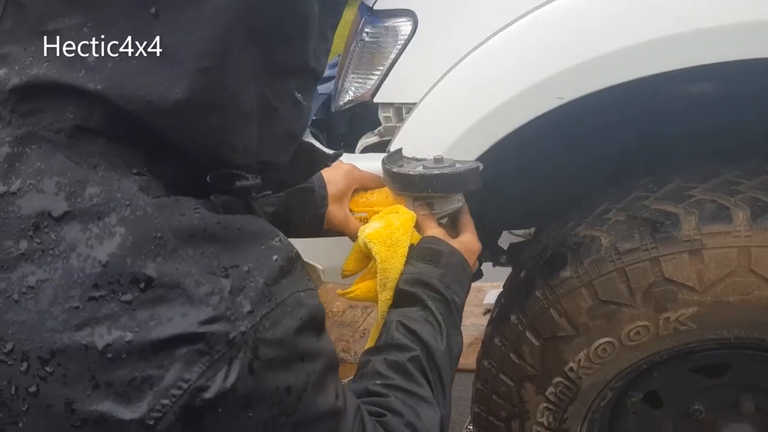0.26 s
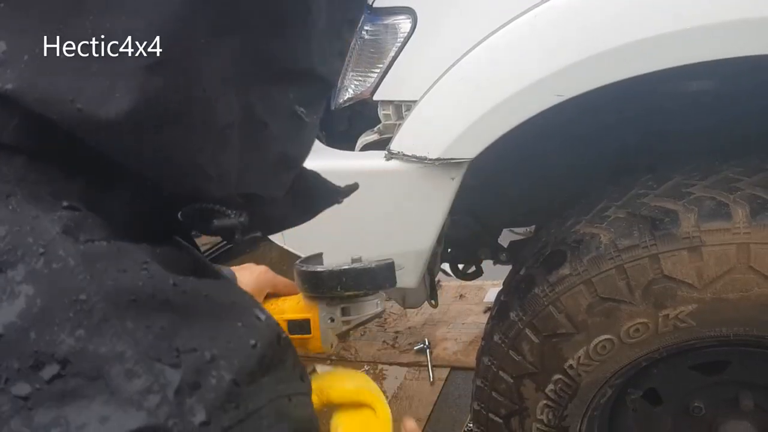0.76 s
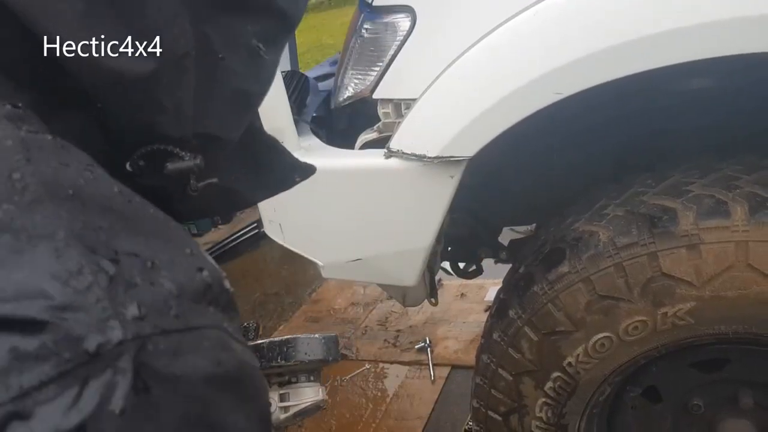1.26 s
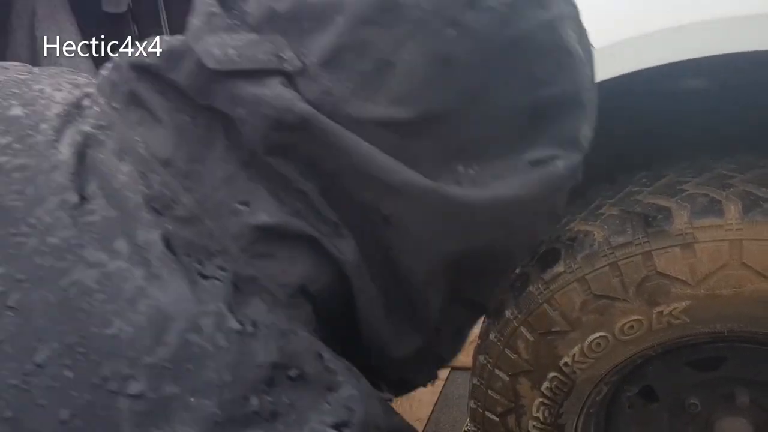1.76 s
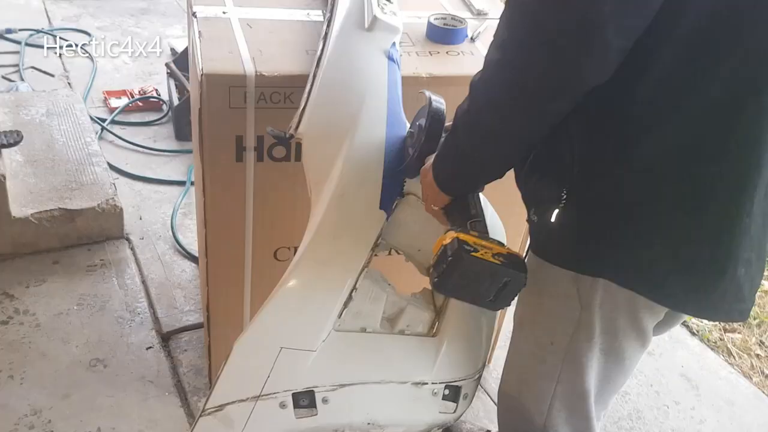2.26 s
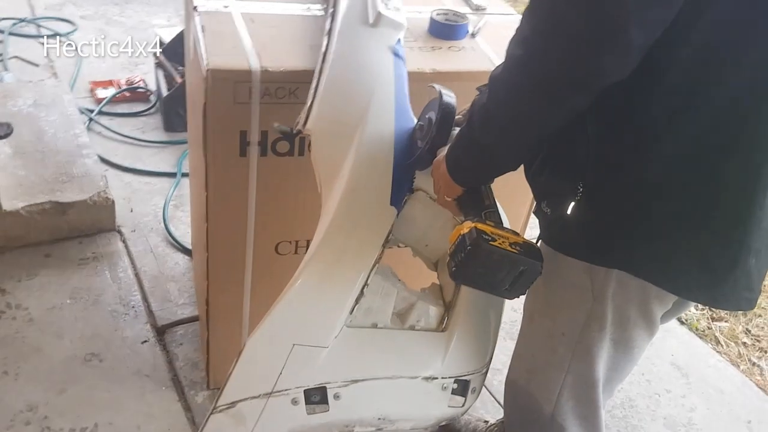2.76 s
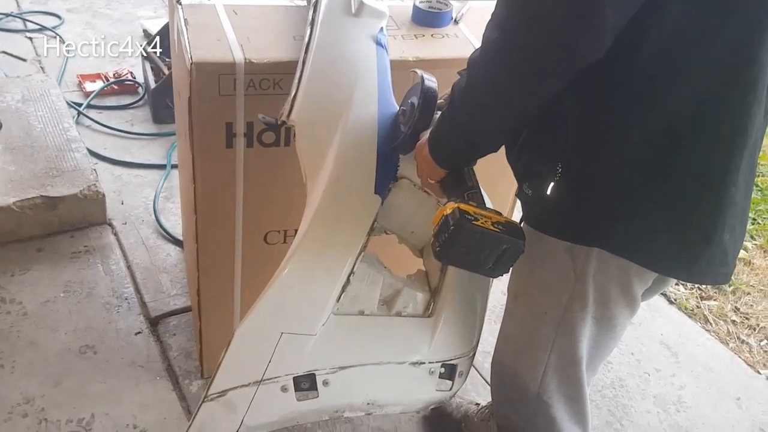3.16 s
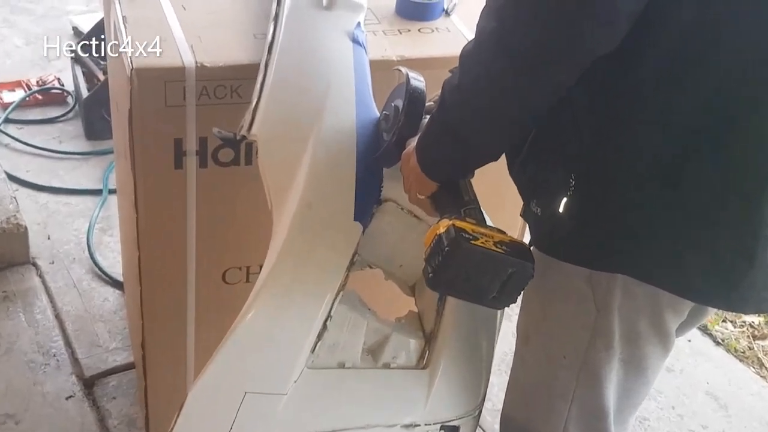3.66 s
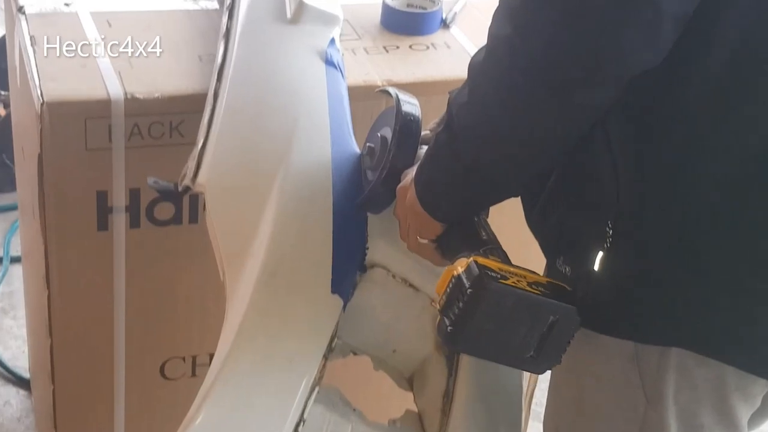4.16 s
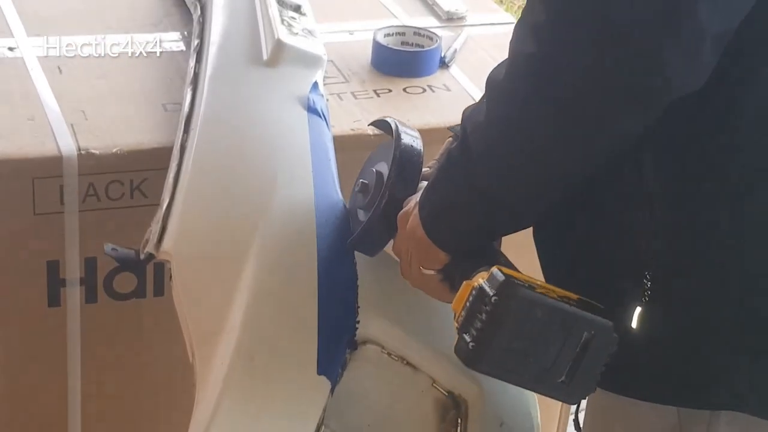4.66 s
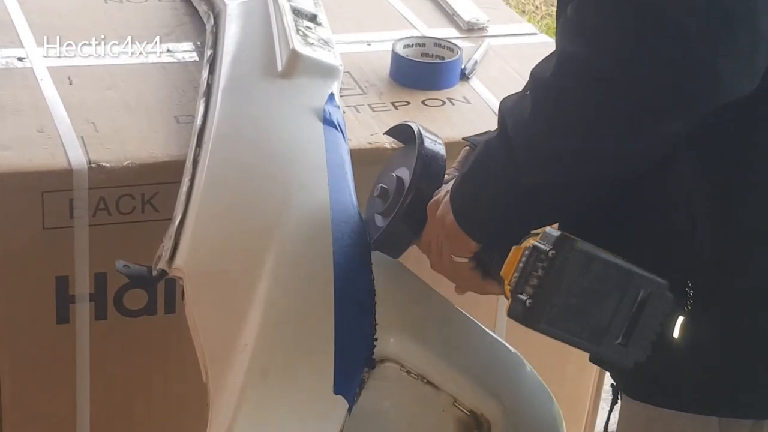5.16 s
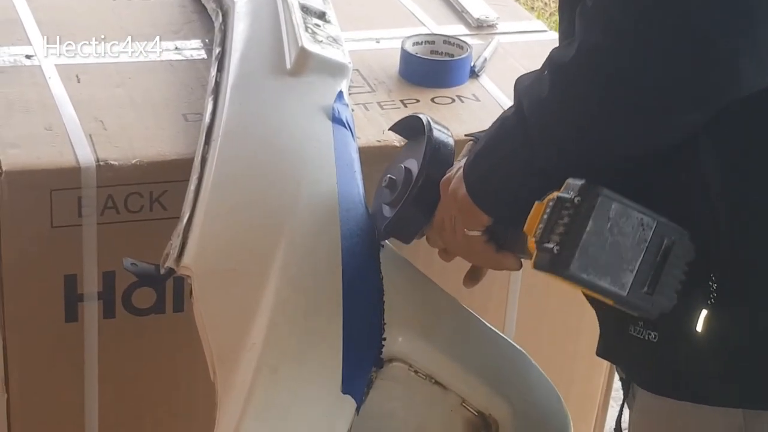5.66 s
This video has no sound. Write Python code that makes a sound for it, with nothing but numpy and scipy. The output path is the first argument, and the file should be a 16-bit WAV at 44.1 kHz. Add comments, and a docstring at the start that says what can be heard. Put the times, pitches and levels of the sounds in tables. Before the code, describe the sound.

A cordless angle grinder cuts plastic with a high whine and hissing rasp, spins free briefly, then cuts again with a sagging pitch.

```python
"""Outdoors, close by, a cordless angle grinder trims plastic car panels.
The disc cuts a wheel arch, lifts off and spins free (fan hiss, motor whine); after a short fade
it works down a loose trim panel. Abrasion gives a broadband rasp. The rim strikes the plastic in
the same pattern on every turn, and this periodic force makes the panel drone on harmonics of a
rotation rate that sags as the disc bites."""
import sys
import numpy as np
from scipy import signal
from scipy.fft import rfft, irfft, next_fast_len
from scipy.io import wavfile
from scipy.ndimage import map_coordinates

SR = 44100
rng = np.random.default_rng(int(sys.argv[2]) if len(sys.argv) > 2 else 0)


def store_wav(level_fs):
    """Save 16-bit WAV to argv[1]."""
    pcm = np.round(np.clip(np.atleast_2d(level_fs), -1, 1) * 32767)
    wavfile.write(sys.argv[1], SR, pcm.T.astype(np.int16))


N = 260322
T = np.arange(N) / SR
FRAME_HZ = 200
FRAMES = np.arange(int(N / SR * FRAME_HZ) + 2) / FRAME_HZ
FREE_TURNS_HZ, GEAR_RATIO = 123.77, 32 / 9
LIFT_S, TRIM_START_S = .49, 2.308   # the disc is clear of the arch; the second cut begins

# Disc speed under load. Each row: time in seconds, turns per second.
ARCH_SPEED = [(0.0, 123.1), (0.09, 123.7), (0.332, 123.5), (0.416, 122.5), (0.45, 123.3)]
TRIM_SPEED = [(2.34, 123.62), (2.55, 121.57), (2.93, 121.41), (3.09, 118.45), (3.4, 120.13), (3.66, 118.49),
              (3.77, 117.38), (3.94, 121.85), (4.06, 121.19), (4.2, 123.99), (4.4, 123.17), (4.5, 118.53),
              (4.61, 112.92), (4.99, 112.83), (5.13, 120.64), (5.29, 123.98), (5.6, 123.58), (5.9, 123.82)]
# Depth of the disc in the trim panel. Each row: time in seconds, depth from 0 to 1.
DEPTH = [(2.4, 0.0), (2.85, 0.11), (3.15, 0.28), (3.8, 0.51), (4.05, 0.62), (4.4, 0.44), (5.12, 0.68),
         (5.24, 0.64)]
# Pinching of the disc by the cut. Each row: time in seconds, binding from 0 to 1.
BINDING = [(4.4, 0), (4.6, 1), (5.0, 1), (5.25, 0)]
# Pressure on the trim panel. Each row: time in seconds, gain in dB.
PRESSURE = [(2.34, 1), (2.46, 0.1), (2.52, -2), (2.62, -0.6), (2.8, 0), (3.2, -0.5), (3.8, -0.5), (4.05, 2),
            (4.2, 1.5), (4.48, 3), (4.65, 1.5), (4.9, 0), (5.05, -0.1), (5.3, 0.1), (5.9, 0.8)]
# The disc snags and the panel flaps. Each row: centre in seconds, half length in seconds, swell in dB.
SNAGS = [(0.351, 0.071, 13), (4.473, 0.037, 1.5), (5.04, 0.04, 4)]
# The drone's response to a snag. Each row: frequency in Hz, share of the swell.
FLAP = [(120, 0.05), (250, 0.75), (500, 0.83), (1300, 0.74), (1550, 0.38), (3000, 0.028)]
# Harmonics of the turning disc; the 32nd is the gear whine. Each row: harmonic number, then relative
# levels in dB on the arch, on the trim's edge, half-way in, deep in and when pinched.
DISC_HARMONICS = [(1, -71, -54, -68, -38, -61), (2, -33, -43, -44, -50, -48), (3, -44, -59, -45, -40, -46),
                  (4, -57, -58, -50, -50, -56), (5, -57, -45, -47, -48, -50), (6, -53, -44, -42, -42, -44),
                  (7, -49, -55, -45, -35.5, -46), (8, -56, -51, -54, -43, -45),
                  (9, -57, -54, -54, -40, -49), (10, -55, -50, -51, -42, -50),
                  (11, -58, -57, -47, -45, -49), (12, -59, -46, -43, -49, -48),
                  (13, -60, -50, -47, -50, -47), (14, -55, -45, -44, -48, -50),
                  (15, -52, -38.5, -52, -52, -48), (16, -52, -48, -51, -52, -51),
                  (17, -60, -40, -45, -49, -44), (18, -52, -48, -52, -45, -47),
                  (19, -53, -38.5, -48, -43, -42), (20, -44, -44, -44, -50, -51),
                  (21, -46, -45, -44, -49, -47), (22, -43, -47, -44, -42, -47),
                  (23, -43, -46, -41, -48, -45), (24, -50, -42, -43, -41, -44),
                  (25, -45, -45, -46, -42, -42), (26, -42, -42, -48, -42, -41),
                  (27, -45, -34, -44, -46, -43), (28, -42, -38, -43, -44, -39),
                  (29, -47, -45, -44, -47, -41), (30, -42, -44, -47, -46, -42),
                  (31, -46, -41, -43, -46, -38), (32, -42, -35.5, -38.5, -37, -36.5),
                  (33, -55, -41, -45, -43, -45), (34, -54, -48, -45, -50, -46),
                  (35, -50, -42, -45, -50, -39), (36, -47, -41, -48, -47, -48)]
# Single harmonics ring out as squeals, hoots or high gear whine.
# Each row: start in seconds, end in seconds, harmonic number, relative level in dB.
SQUEALS = [(0.0, 0.39, 87, -30), (0.24, 0.3, 20, -44), (0.25, 0.295, 42, -32), (2.36, 2.95, 85, -32),
           (2.4, 2.95, 91, -29), (2.45, 2.95, 94, -30), (2.5, 2.95, 90, -33), (2.5, 2.95, 93, -35),
           (2.5, 2.95, 98, -38), (2.36, 3.8, 42, -45), (2.42, 2.5, 29, -35), (2.36, 2.56, 28, -35),
           (3.45, 3.9, 28, -40), (3.95, 4.42, 90, -33), (4.45, 4.54, 4, -35), (4.5, 4.6, 7, -35),
           (4.55, 5.05, 57, -37), (4.6, 5.05, 64, -36), (4.7, 5.0, 96, -33), (5.02, 5.085, 7, -34),
           (5.19, 5.32, 3, -40), (5.2, 5.9, 57, -41), (5.25, 5.9, 85, -39), (5.3, 5.9, 102, -39)]
# Rotor tones. Each row: multiple of the motor speed, relative level in dB.
RATTLE_TONES = [(1, -46), (2, -52.5), (3, -76), (4, -52), (10, -40.5), (11, -40.5), (17, -39), (19, -39.5)]
MOTOR_TONES = [(1, -27), (8, 0), (12, -22), (16, -21), (19, -15)]   # the eight-blade fan gives the strongest
# Fan whine, swelling as the tool is turned about. Each row: time in seconds, level in dB.
FREE_WHINE = [(0.36, -41), (0.42, -34.5), (0.47, -34.5), (0.52, -42), (0.662, -40), (0.698, -37),
              (0.788, -33.5), (0.85, -46), (0.96, -38), (1.072, -32), (1.18, -32.5), (1.245, -43),
              (1.3, -35.5), (1.46, -41), (1.592, -39), (1.604, -32), (1.7, -34), (1.83, -31), (1.91, -40),
              (1.95, -35), (2.036, -45), (2.122, -32), (2.2, -35), (2.27, -38)]   # on the arch and running free
TRIM_WHINE = [(2.34, -38), (2.5, -37), (2.6, -42), (3.3, -43), (4.3, -43), (4.8, -45), (5.2, -42),
              (5.55, -35), (5.9, -39)]
# Low rush of the air. Each row: time in seconds, gain in dB.
LOW_RUSH = [(.5, 4.5), (.8, 1), (1.45, 4), (2.0, 8.5)]
# Soft handling bumps and sharp ticks of flying chips. Each row: start in seconds, peak level in dB.
BUMPS = [(1.185, -38.5), (1.83, -33.5), (2.012, -41)]
CHIPS = [(0.254, -19), (1.516, -25), (2.4, -23), (2.469, -17), (4.477, -6), (4.523, -8)]

# Resonances. Each row: centre in Hz, width in Hz, gain in dB.
PANEL_MODES = [(253.7, 19, 8.5), (482.9, 29, 17), (711, 9, 5.5), (873.3, 26, 12.5), (1526, 71, 5.5),
               (1692, 25, 2.5), (2804, 48, 5.5), (3058, 92, 9.5)]
DISC_GUARD_MODES = [(2530, 630, 4), (10730, 470, 2), (11200, 950, 1.03)]
# Peaks and hollows in the rasp's tone at each stage of the trim cut.
# Each row: centre in Hz, width in Hz, gain in dB.
EDGE_TONE = [(1850, 130, 4), (2450, 400, 1.5), (3400, 330, -0.5), (4800, 200, -3), (5870, 160, -5),
             (8400, 500, -8), (9550, 400, 5), (10300, 160, 6), (11500, 900, -0.5), (12300, 500, -1)]
SUNK_TONE = [(2100, 180, 0), (3820, 200, 3), (4550, 260, -6), (5830, 300, -3), (6520, 200, 0.5),
             (7130, 340, 2.5), (8480, 280, -3), (8840, 200, 4.5), (10650, 210, -0.5)]
PINCHED_TONE = [(3130, 500, -0.5), (3880, 180, 0), (4440, 600, -2.5), (5560, 500, -2.5), (6230, 160, -4),
                (6800, 600, 2), (8000, 460, -3), (10200, 820, -4), (11400, 1200, 4), (13300, 600, -6)]
# Noise spectra. Each row: frequency in Hz, relative spectral density in dB.
ARCH_COLOUR = [(50, -57), (130, -30), (260, -15), (550, -30), (1000, -23), (1600, -28.5), (2600, -17.5),
               (3600, -12), (4900, -12), (6300, -16.5), (7500, -8.5), (8500, -10.5), (11000, -1),
               (13000, -0.5), (15800, -9.5)]
AIR_COLOUR = [(50, -35), (113, -17.5), (150, -19.5), (430, -24.5), (560, -24.5), (850, -23), (1300, -15),
              (2050, -16), (2330, -10), (3700, -3), (8500, -8.5), (11000, 1.5), (13000, -3.5), (15800, -10)]
TRIM_COLOUR = [(50, -45), (130, -19), (260, -20.5), (550, -17.5), (1000, -17.5), (1600, -19), (2600, -18),
               (3600, -10), (4700, -11), (5800, -9), (6600, -5), (7300, -7.5), (8400, -10.5), (11000, -2),
               (13000, -2.5), (15800, -13.5)]
# Stereo balance. Each row: frequency in Hz, left minus right in dB.
ARCH_PAN = [(100, 5), (270, 3), (750, 5.5), (2000, 10), (3300, 0.5), (5500, 5), (9000, 16), (11000, 8.5),
            (13000, -7), (15000, 11)]
AIR_PAN = [(100, -1), (270, 6), (750, 6), (2000, 9.5), (3300, -1), (5500, 0.5), (9000, 14.5), (11000, 11),
           (13000, -10), (15000, 3)]
TRIM_PAN = [(100, 5), (270, 0.5), (480, 5.5), (850, 9), (2000, 11), (3300, 4.5), (5500, 7.5), (9000, 18),
            (11000, 9.5), (13000, -4), (15000, 8)]
# Coherence of the noise. Each row: frequency in Hz, left-right correlation.
COHERENCE = [(60, 0.25), (130, 0.54), (400, 0.083), (1000, 0.058), (8000, 0.093), (14000, 0.19)]
# Five noise bands: body, rasp, hiss, shriek and top. Each entry: centre in Hz.
BAND_CENTRES_HZ = [800, 2800, 6800, 10900, 13000]
# Band swells on the arch, on the trim's edge, deep in, and extra when pinched. Each entry: gain in dB.
ARCH_BANDS_DB = [1.5, -2, 3.5, -2.5, 0.5]
EDGE_BANDS_DB = [-0.07, 1.6, -0.91, 1.5, -0.43]
DEEP_BANDS_DB = [3, 3, 3.5, -5.5, -2]
PINCHED_BANDS_DB = [-3.5, 0, 1, 2, 2]
# Air noise as the vents turn to and fro. Each entry: one band's share of the whine's swing in dB.
AIR_FOLLOWS = [0.021, 0.13, 0.056, 0.048, 0.04]


def trim_cut(turns, bite_s=.13, bite_db=3):
    """Forced vibration of a loose panel: pressure sets the level, depth and pinching the spectrum."""
    depth = in_time(DEPTH, FRAMES)
    pinched = in_time(BINDING, FRAMES)
    pressure_db = in_time(PRESSURE, FRAMES)
    swells_db = blend([EDGE_BANDS_DB, DEEP_BANDS_DB], depth)
    swells_db += np.outer(PINCHED_BANDS_DB, pinched) + pressure_db
    swells_db[0] += snag_db(FRAMES)
    repeats = per_sample(np.interp(depth, [0, 1], [.71, .5]))
    grains = abrasion(turns, repeats, wear_hz=6.7, throb_db=1.1, grain_db=1)
    rasp = coloured(grains, TRIM_COLOUR, TRIM_PAN, swells_db, shriek_db=-19.5, flicker_db=.47)
    rasp = shifting_tone(rasp, depth, pinched)
    *by_depth_db, pinched_db = np.transpose(DISC_HARMONICS)[2:]
    levels_db = (1 - pinched) * blend(by_depth_db, depth) + np.outer(pinched_db, pinched) + pressure_db
    # the drone builds up as the disc takes hold
    levels_db -= bite_db * np.clip(1 - (FRAMES - TRIM_START_S) / bite_s, 0, 1)
    drone = panel_drone(turns, TRIM_SPEED, levels_db, PANEL_MODES, TRIM_PAN, rough=.9, swing_db=2)
    rattle_gain = per_sample(from_db(pressure_db - 5 * pinched - 1.9 * (2 - depth)))
    return rasp + from_db(1.7) * drone + rattle_gain * rattle(turns)


def arch_cut(turns, ease_s=.11, ease_db=17):
    """Forced vibration of the firm wheel arch: a light cut snags once and fades as the force eases."""
    pressure_db = -ease_db * np.clip(1 + (FRAMES - LIFT_S) / ease_s, 0, 1)
    swells_db = np.array(ARCH_BANDS_DB)[:, None] + pressure_db
    swells_db[0] += snag_db(FRAMES)
    grains = abrasion(turns, repeats=.65, wear_hz=7.1, throb_db=1.5, grain_db=2)
    rasp = coloured(grains, ARCH_COLOUR, ARCH_PAN, swells_db, shriek_db=-17.5, flicker_db=1.5)
    levels_db = np.array(DISC_HARMONICS)[:, [1]] + .38 * pressure_db
    drone = panel_drone(turns, ARCH_SPEED, levels_db, [], ARCH_PAN, rough=.65, swing_db=2.5)
    return rasp + from_db(1.2) * drone


def abrasion(turns, repeats, wear_hz, throb_db, grain_db, count=135, split_hz=4500):
    """Slowly wearing grains return each turn, giving a line spectrum; random tearing gives noise."""
    harmonic = np.arange(1, count + 1)[:, None]
    # the periodic part lies above the drone and is strongest where the disc itself rings
    disc_ring = np.exp(-((harmonic * FREE_TURNS_HZ - 11100) / 900) ** 2)
    weight = (harmonic > len(DISC_HARMONICS)) * (.65 + 1.05 * disc_ring)
    returning = np.array([rms_one(spin(wander(wear_hz, count) * weight, turns)) for _ in range(2)])
    white = rng.standard_normal((2, N))
    grain_gain = from_db(grain_db * rng.standard_normal(N // 16 + 1).repeat(16)[:N])
    tearing = rms_one(white * grain_gain)
    # the disc runs slightly out of true and presses harder on parts of each turn
    pressure = from_db(throb_db * rms_one(spin(wander(.99, count=4), turns)))
    low = signal.sosfilt(signal.butter(3, split_hz, fs=SR, output="sos"), tearing)
    high = signal.sosfilt(signal.butter(3, split_hz, "high", fs=SR, output="sos"), tearing)
    return pressure * (low + np.sqrt(1 - repeats) * high + .7 * np.sqrt(repeats) * returning)


def panel_drone(turns, speed_curve, levels_db, modes, pan, rough, swing_db):
    """Resonance: each harmonic of the turning disc swells as it slides through a panel mode."""
    count = len(DISC_HARMONICS)
    harmonic = np.arange(1, count + 1)[:, None]
    hz = harmonic * in_time(speed_curve, FRAMES)
    height = harmonic / count
    lift_db = peaks_db(modes, hz)
    db = levels_db + lift_db + at_hz(FLAP, hz) * snag_db(FRAMES)
    # a resonance steadies the harmonic that it holds
    unsteady = np.cbrt(height) * from_db(-.9 * np.clip(lift_db, 0, 8))
    db += swing_db * unsteady * rms_one(wander(2.85, count).real)
    start_phase = np.exp(2j * np.pi * rng.random(harmonic.shape))
    # short waves reach the two sides further out of step, and waver more
    skew = np.exp(1j * (.13 + .5 * np.sqrt(height)) * rng.choice([-1, 1], harmonic.shape))
    waver = rough * unsteady
    strength = from_db(db) * start_phase / np.sqrt(1 + waver ** 2)
    return np.array([spin(strength * gain * (phase + waver * wander(11, count)), turns)
                     for gain, phase in zip(panned(at_hz(pan, hz)), (skew, skew.conj()))])


def shifting_tone(rasp, depth, pinched, sunk_depth=.14):
    """Time-varying filtering: the rasp's peaks and hollows change with each stage of the cut."""
    hz, t, spectra = signal.stft(rasp, SR, nperseg=1024)
    sunk = np.interp(t, FRAMES, np.clip(depth / sunk_depth, 0, 1))
    bound = np.interp(t, FRAMES, pinched)
    stages = [(EDGE_TONE, 1 - sunk), (SUNK_TONE, sunk * (1 - bound)), (PINCHED_TONE, bound)]
    db = sum(np.outer(peaks_db(peaks, hz), share) for peaks, share in stages)
    return signal.istft(spectra * from_db(db), SR)[1][:, :N]


def snag_db(t):
    """Transient loading: each snag swells and dies as a bell curve."""
    return sum(db * np.exp(-((t - centre) / length) ** 2) for centre, length, db in SNAGS)


def squeals(turns, gain_db=1.5, pan_db=10, rough=.81, ramp_s=.021):
    """Narrow-band tones: single wavering harmonics ring out as squeals, hoots or high gear whine."""
    out = np.zeros((2, N))
    for start, end, harmonic, db in SQUEALS:
        gate = np.clip(np.minimum(T - start, end - T) / ramp_s + .5, 0, 1)
        tone = gate * from_db(db) * np.exp(2j * np.pi * (harmonic * turns + rng.random()))
        waver = (1 + rough * wander(18, count=2)) / np.sqrt(1 + rough ** 2)
        out += [(tone * per_sample(side)).real for side in waver]
    return np.sqrt(2) * from_db(gain_db) * panned([pan_db]) * out


def rattle(turns, rough=3, pan_db=10):
    """Loose contact with the panel randomly modulates the harmonics of the loaded rotor."""
    out = 0
    for multiple, db in RATTLE_TONES:
        tone = from_db(db) * np.exp(2j * np.pi * multiple * GEAR_RATIO * turns)
        contact = (1 + rough * wander(10.6)[0]) / np.sqrt(1 + rough ** 2)
        out += (tone * per_sample(contact)).real
    return np.sqrt(2) * panned([pan_db]) * out


def motor_whine(turns, whine_db, pan_db=12.5, waver_db=1.2):
    """Blade-passing and rotor tones, geared to the disc; each side wavers as the tool moves."""
    angle = 2 * np.pi * GEAR_RATIO * turns
    sides = []
    for _ in range(2):
        tones = sum(from_db(db) * np.sin(k * angle + .5 * drift(4.1)) for k, db in MOTOR_TONES)
        sides.append(tones * from_db(waver_db * drift(16)))
    return np.sqrt(2) * from_db(whine_db) * panned([pan_db]) * sides


def air_rush():
    """Turbulence in the vents and round the free disc makes noise that swells with the whine."""
    usual_db = np.median(np.array(FREE_WHINE)[:, 1])
    swells_db = np.outer(AIR_FOLLOWS, in_time(FREE_WHINE, FRAMES) - usual_db)
    swells_db[0] += in_time(LOW_RUSH, FRAMES)
    white = rng.standard_normal((2, N))
    return coloured(white, AIR_COLOUR, AIR_PAN, swells_db, shriek_db=-26.5, flicker_db=1.24)


def impacts(events, band_hz, decay_s):
    """Damped impacts: each is a burst of band-limited noise that decays exponentially."""
    out = np.zeros(N)
    band = signal.butter(2, band_hz, "band", fs=SR, output="sos")
    age = T[:SR // 4]
    for start, db in events:
        burst = signal.sosfilt(band, rng.standard_normal(len(age)) * np.exp(-age / decay_s))
        at = int(start * SR)
        out[at:at + len(age)] += (from_db(db) * burst / np.abs(burst).max())[:N - at]
    return out


def reflected(x, delay_s=.0022, sway_s=.00018, strength=.3):
    """Comb filtering: the panel's reflection interferes along a path that changes as the hand moves."""
    late = np.arange(N) - SR * (delay_s + sway_s * drift(.8))
    return x + strength * np.array([np.interp(late, np.arange(N), side) for side in x])


def coloured(source, colour, pan, swells_db, shriek_db, flicker_db, shriek_from_hz=8500):
    """Spectral shaping: two unrelated sources become partly coherent noise in five swelling bands."""
    size = next_fast_len(N)
    hz = np.arange(size // 2 + 1) * SR / size
    mid, side = rfft(reflected(source), size)
    alike = at_hz(COHERENCE, hz)
    spectrum = np.sqrt(1 + alike) * mid + np.sqrt(1 - alike) * side * [[1], [-1]]
    spectrum *= from_db(at_hz(colour, hz) + peaks_db(DISC_GUARD_MODES, hz)) * panned(at_hz(pan, hz))
    # the shriek, the loudest part, sets the level before the swells
    shriek = irfft(spectrum.mean(axis=0) * (hz > shriek_from_hz), size)
    spectrum *= from_db(shriek_db) / shriek.std()
    out = 0
    for peak, db in zip(np.eye(len(BAND_CENTRES_HZ)), swells_db):
        band = irfft(spectrum * np.interp(hz, BAND_CENTRES_HZ, peak), size)[:, :N]
        out += band * from_db(per_sample(db) + flicker_db * drift(5.8))
    return out


def spin(harmonics, turns, size=2048):
    """Fourier synthesis of a once-per-turn pattern from complex amplitudes (harmonic, frame)."""
    pattern = irfft(np.pad(harmonics, ((1, 0), (0, 0))), size, axis=0) * size / np.sqrt(2)
    return map_coordinates(pattern, [turns % 1 * size, T * FRAME_HZ], order=1, mode="grid-wrap")


def peaks_db(peaks, hz):
    """Each peak or hollow adds a Lorentzian curve to the gain in dB."""
    return sum(db / (1 + (2 * (hz - centre) / width) ** 2) for centre, width, db in peaks)


def wander(rate_hz, count=1):
    """Low-passed complex noise of rms 1: one row per strand, one column per frame."""
    pole = np.exp(-2 * np.pi * rate_hz / FRAME_HZ)
    real, imag = rng.standard_normal((2, count, 2 * len(FRAMES)))
    smooth = signal.lfilter([1], [1, -2 * pole, pole * pole], real + 1j * imag)
    return rms_one(smooth[:, len(FRAMES):])


def drift(rate_hz):
    """Slow random modulation of rms 1 at every sample."""
    return per_sample(rms_one(wander(rate_hz)[0].real))


def blend(stages, depth):
    """Interpolation through evenly spaced stages, from the edge to deep in; one row per value."""
    return np.array([np.interp(depth, np.linspace(0, 1, len(stages)), row)
                     for row in np.transpose(stages)])


def panned(pan_db):
    """Amplitude panning: left and right gains whose mean is 1."""
    ratio = from_db(pan_db)
    return np.array([2 * ratio, np.full_like(ratio, 2)]) / (1 + ratio)


def in_time(curve, t):
    """Linear interpolation of a curve at the times t."""
    return np.interp(t, *np.transpose(curve))


def per_sample(frames):
    """Linear interpolation from frames to samples."""
    return np.interp(T, FRAMES, frames)


def at_hz(points, hz):
    """Interpolation of a spectrum on a log-frequency axis."""
    known_hz, value = np.transpose(points)
    return np.interp(np.log(np.maximum(hz, 1)), np.log(known_hz), value)


def from_db(db):
    """Decibels to amplitude ratio."""
    return 10 ** (np.asarray(db) / 20)


def rms_one(x):
    """Normalisation to rms 1."""
    return x / np.sqrt(np.mean(np.abs(x) ** 2) + 1e-20)


def scene(release_s=.0618, fade_s=.03):
    """Superposition of the sources on one shared rotation: cut, lift off, run free, fade, cut again."""
    touching = np.clip((LIFT_S - T) / release_s, 0, 1)
    on_trim = T > TRIM_START_S
    first_speed = touching * in_time(ARCH_SPEED, T) + (1 - touching) * FREE_TURNS_HZ
    speed = np.where(on_trim, in_time(TRIM_SPEED, T), first_speed)
    # the drag of cutting makes the speed tremble
    tremble = (.0002 + .0005 * np.maximum(touching, on_trim)) * drift(15)
    turns = np.cumsum(speed * (1 + tremble)) / SR
    arch = np.sqrt(touching) * arch_cut(turns)
    air = np.sqrt(1 - touching) * air_rush()
    whine_db = np.where(on_trim, in_time(TRIM_WHINE, T), in_time(FREE_WHINE, T))
    tool = np.where(on_trim, trim_cut(turns), arch + air) + motor_whine(turns, whine_db) + squeals(turns)
    bumps = impacts(BUMPS, band_hz=[57, 310], decay_s=.034)
    chips = impacts(CHIPS, band_hz=[2500, 16000], decay_s=.0016) * panned([6])
    fade = np.clip(np.abs(T - TRIM_START_S) / fade_s, 0, 1) ** 2
    return (tool + bumps + chips) * np.maximum(fade, .015)


def record(dry, cutoff_hz=15900):
    """Band limiting: an elliptic low-pass cuts the top steeply."""
    return signal.sosfilt(signal.ellip(12, .1, 80, cutoff_hz, fs=SR, output="sos"), dry)


dry = scene()
out = record(dry)
store_wav(out)
```